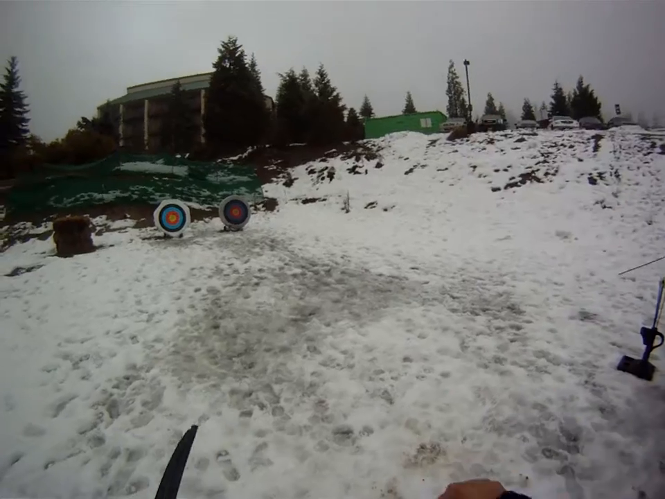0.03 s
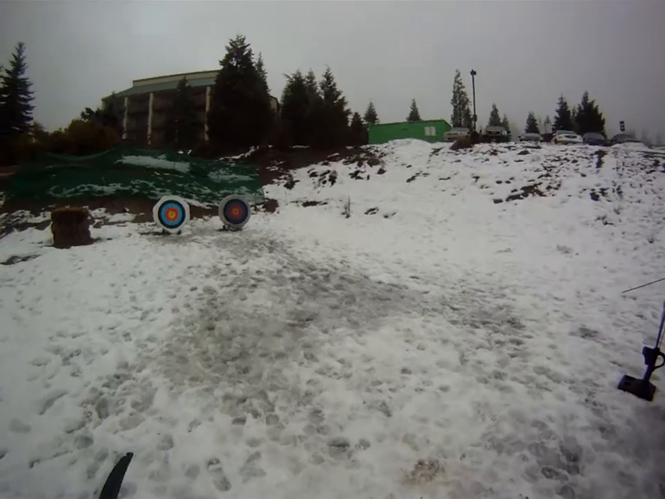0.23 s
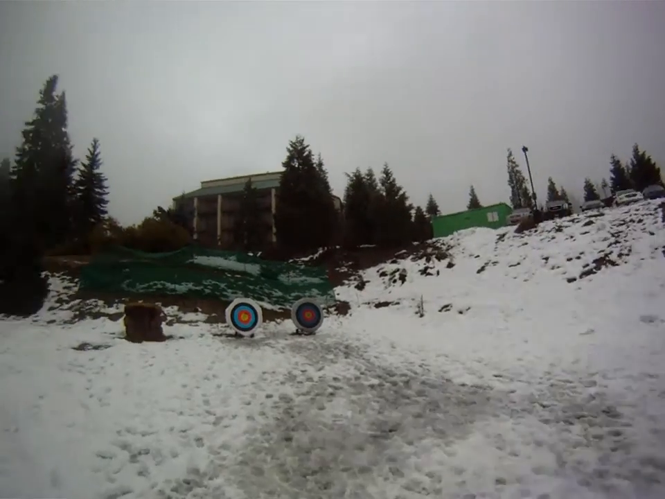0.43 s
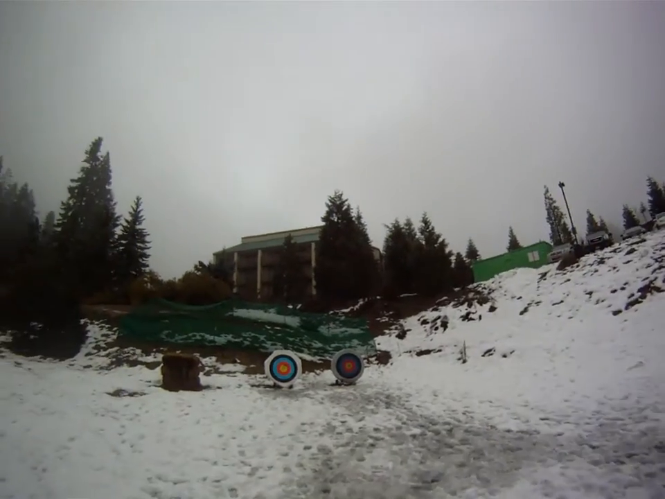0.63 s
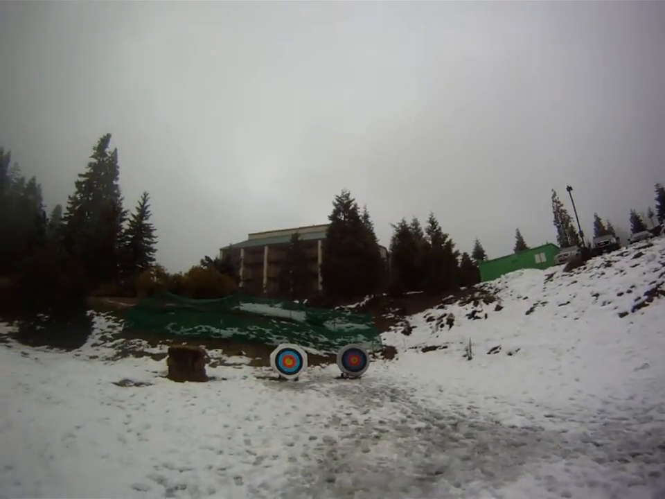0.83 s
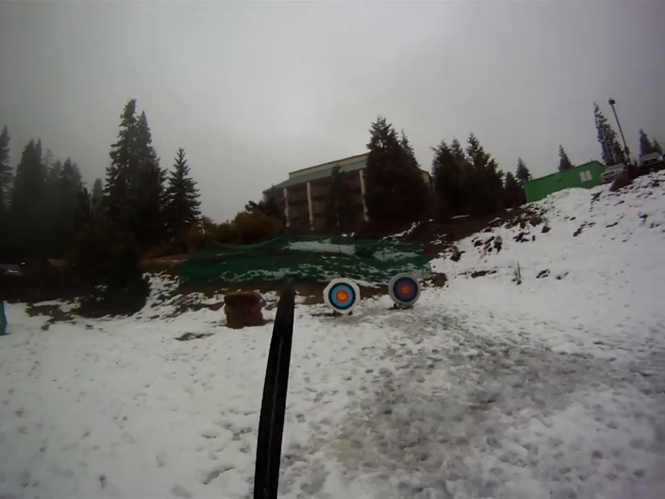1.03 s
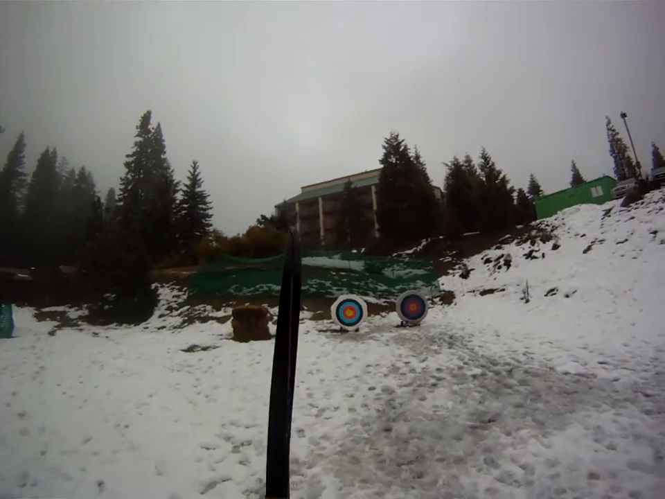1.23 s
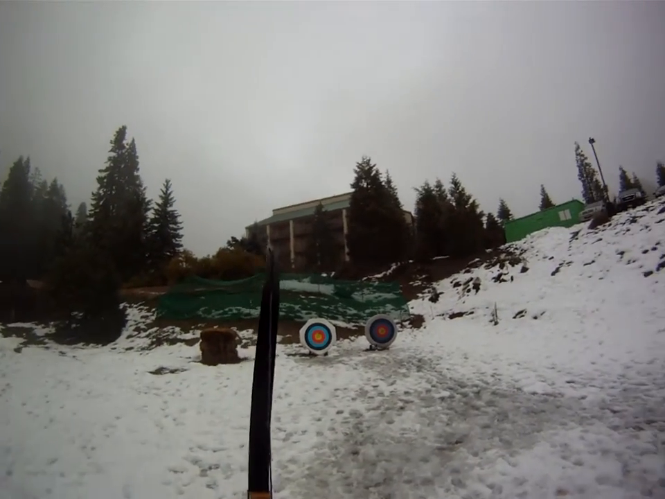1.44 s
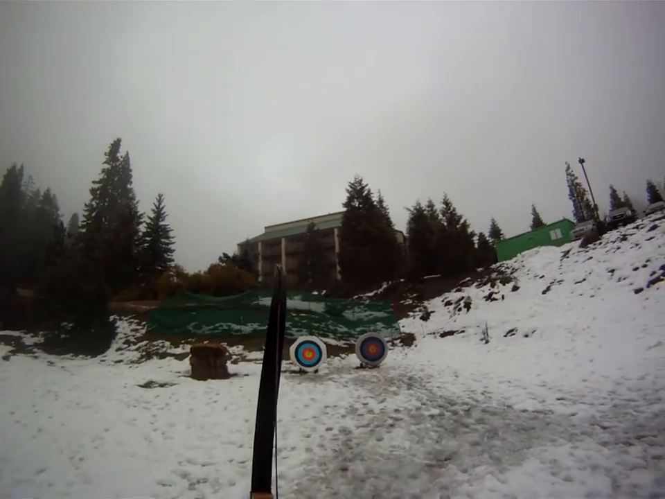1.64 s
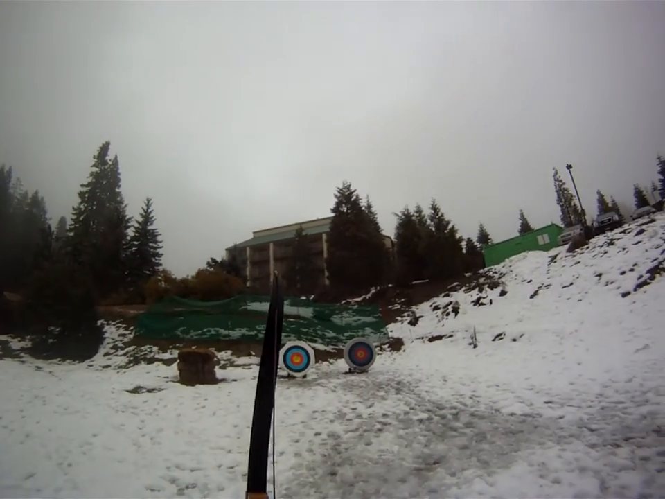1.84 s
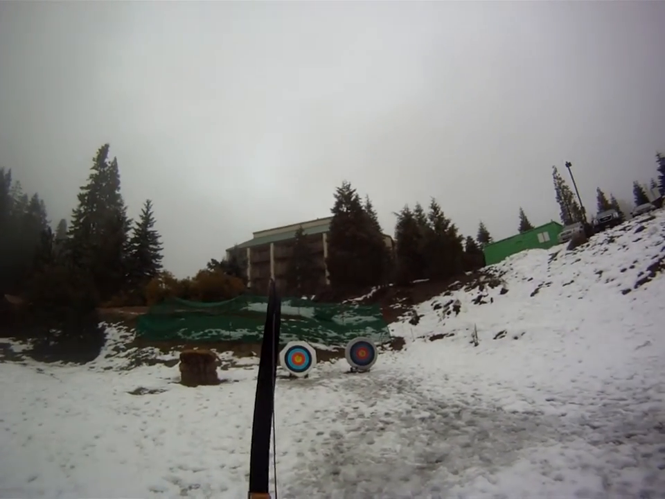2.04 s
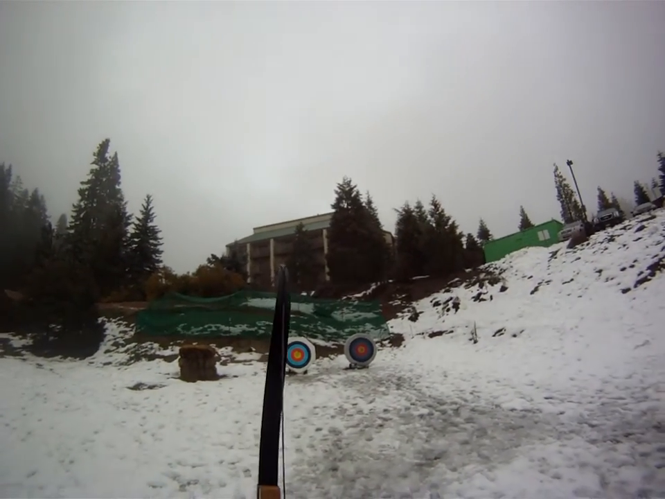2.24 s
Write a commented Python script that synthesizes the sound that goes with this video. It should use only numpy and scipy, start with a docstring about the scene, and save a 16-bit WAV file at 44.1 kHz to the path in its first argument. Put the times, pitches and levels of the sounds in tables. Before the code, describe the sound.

Light clicks and ticks of an arrow being fitted to a bow, over faint wind.

```python
"""An archer on a quiet snowy slope readies a bow, heard from a camera worn on the body.
First the arrow scuffs and slides along the bow by friction, then knocks home and rings in damped modes.
Light ticks follow, fittings clack, and after two seconds the nock clicks on the string. A faint slide
ends the scene. Throughout, light wind and body movement rumble in the microphone over a faint hiss."""
import sys
import numpy as np
from scipy import signal
from scipy.fft import rfft, irfft, next_fast_len
from scipy.io import wavfile
from scipy.ndimage import uniform_filter1d

SR = 44100
rng = np.random.default_rng(int(sys.argv[2]) if len(sys.argv) > 2 else 0)


def output_pcm(signal):
    """Save a mono or channel-first signal as 16-bit PCM at the path in sys.argv[1].

    Samples are clipped to [-1, 1] before scaling.
    """
    pcm = np.clip(np.atleast_2d(signal).T, -1, 1) * 32767
    wavfile.write(sys.argv[1], SR, np.round(pcm).astype(np.int16))


N = 105840
TIME = np.arange(N) / SR
BLOOM_S, SNAP_BLOOM_S = 0.00071, 0.00038  # time constants for vibration to spread through a part


# Each row: start in seconds, ring level in dB, crack level in dB.
KNOCKS = [(0.8548, -56, -49), (0.8568, -49, -47), (0.8594, -35.5, -40), (0.8633, -55, -56),
          (0.8695, -57, -56)]
# Each row: mode frequency in Hz, level in dB, 60 dB decay time in seconds.
ARROW_MODES = [(1568, -13, .08), (1778, -8, .066), (1883, -15, .04), (2005, -10, .06), (2175, -13, .095),
               (2285, -17, .05), (2395, -14.5, .075), (2995, -18.5, .07), (3542, -5, .036),
               (3860, -8.5, .03), (8150, -17, .035), (8455, -11, .035), (9825, -20, .06), (10120, -19, .05),
               (10430, -22, .066), (13790, -22, .06), (14190, -22, .06)]
# Each row: frequency in Hz, relative level in dB.
KNOCK_SPECTRUM = [(300, -16), (1200, -13), (1850, 11.5), (2800, -0.5), (3650, 6.5), (4300, -10), (5000, -9),
                  (7000, -9), (8400, -5.5), (10200, -11.5), (11300, -33), (13000, -28), (14000, -10),
                  (16000, -5)]
def arrow_knock():
    """Impact excitation: the arrow strikes the bow in quick succession and rings in its modes."""
    return impacts(KNOCKS, ARROW_MODES, KNOCK_SPECTRUM)


# Each row: start in seconds, ring level in dB, crack level in dB.
NOCK_CONTACTS = [(2.133, -59, -55), (2.1355, -49.5, -56), (2.138, -55, -52), (2.1686, -42, -44),
                 (2.172, -50, -48), (2.1778, -44, -52.5), (2.187, -59, -64)]
# Each row: mode frequency in Hz, level in dB, 60 dB decay time in seconds.
NOCK_MODES = [(1700, -15, .06), (2007, -8.5, .07), (2150, -6.5, .06), (2240, -10, .04), (2655, -6, .06),
              (2755, -6.5, .07), (2965, -13, .04), (3820, -17, .035), (9250, -15, .045), (9760, -20, .04),
              (14690, -18, .045)]
# Each row: frequency in Hz, relative level in dB.
NOCK_SPECTRUM = [(300, -21), (1300, -20), (2350, 14.5), (3400, -0.5), (6000, -10), (8200, -7.5),
                 (9600, 3.5), (11700, -33), (14600, -1.5)]
def nock_click():
    """Free vibration: nock and shaft ring on after each contact with the string."""
    return impacts(NOCK_CONTACTS, NOCK_MODES, NOCK_SPECTRUM)


# Each row: start in seconds, ring level in dB, snap level in dB, pitch ratio of the snap.
CLACKS = [(1.3885, -57, -37, 1), (1.3893, -50, -42.5, .99), (1.3927, -45.5, -51, 0.86),
          (1.3958, -52, -60, 1.1), (1.397, -46, -49, 0.99), (1.7536, -59, -44, 1.02),
          (1.7557, -65, -43, 1.05), (1.7585, -54.5, -66, 1), (2.0152, -65, -50, 1.05),
          (2.2256, -61, -52.5, 1.03)]
# Each row of both: mode frequency in Hz, level in dB, 60 dB decay time in seconds.
SNAP_MODES = [(1115, -20, 0.022), (3540, -5, 0.012), (3693, -3, 0.012), (5220, -1.5, 0.0099),
              (6610, -3.5, 0.011), (7920, -5.5, .009), (8450, -10, 0.0089)]
FITTING_MODES = [(1064, -14, 0.048), (1360, -16, .045), (1772, -11, .06), (2120, -12, 0.051),
                 (2350, -9, 0.041), (2610, -10.5, .04), (2920, -4.5, 0.035), (3310, -8, .028),
                 (3490, -7, 0.027), (3800, -9, 0.027), (4370, -12, 0.026), (8400, -8, 0.024),
                 (9100, -14, 0.027), (9660, -14, 0.024), (14500, -13.5, .024)]
# Each row: frequency in Hz, relative level in dB.
CLACK_SPECTRUM = [(300, -12), (1000, -5), (2200, 2), (3500, -3), (4500, -3), (9300, -7), (11800, -22),
                  (14500, -9)]
def fittings():
    """Modal damping: small hard parts snap briefly, each at its own pitch, over a longer ring."""
    starts, ring_db, snap_db, pitches = np.array(CLACKS).T
    snaps = sum(ring(impulses([(at, db)]), np.array(SNAP_MODES) * [pitch, 1, 1], SNAP_BLOOM_S)
                for at, db, pitch in zip(starts, snap_db, pitches))
    crack = cracks(zip(starts, snap_db - 15), CLACK_SPECTRUM)
    return snaps + crack + ring(impulses(zip(starts, ring_db)), FITTING_MODES, BLOOM_S)


# Each row: start in seconds, level in dB.
TICKS = [(0.109, -56.5), (0.5582, -51), (0.9289, -47), (0.9348, -42), (0.9403, -52), (0.9535, -52),
         (0.9793, -51.5), (0.9875, -55), (2.1686, -44), (2.172, -47), (2.1775, -51)]
# Each row: mode frequency in Hz, level in dB, 60 dB decay time in seconds.
TICK_MODES = [(3630, -9.5, 0.017), (5250, 1.5, 0.0083), (6660, 1.5, 0.007), (8200, -15, .014)]
def ticks():
    """Damped high modes: light, dry gear ticks and the bright edge of the nock clicking on the string."""
    return ring(impulses(TICKS), TICK_MODES, SNAP_BLOOM_S) + undb(-14) * cracks(TICKS, CLACK_SPECTRUM)


# Each row: peak time in seconds, level in dB, rise and fall widths in seconds.
SLIDES = [(0.763, -56.1, 0.08, 0.083), (2.39, -66, 0.08, .05)]
# Each row: frequency in Hz, relative level in dB.
SLIDE_SPECTRUM = [(300, -48), (1300, -4), (1800, -0.5), (2600, -3), (3300, -3), (4250, 3.5), (5200, -5.5),
                  (6500, -8), (7700, -2.5), (9000, -10), (10200, -12), (11500, -32), (13000, -21),
                  (14800, -13)]
# Each row: mode frequency in Hz, level in dB, 60 dB decay time in seconds.
SLIDE_MODES = [(1890, -6, 0.032), (2220, -6.5, 0.03), (2650, -1.5, 0.015), (3020, -6, 0.021),
               (4330, 1, .011), (7720, -5, .009)]
def arrow_slides():
    """Forced vibration: sliding along the bow drives the arrow's resonances."""
    return friction(SLIDES, SLIDE_SPECTRUM, SLIDE_MODES, ring_db=-5)


# Each row: peak time in seconds, level in dB, rise and fall widths in seconds.
SCUFFS = [(0.21, -61, 0.018, 0.026), (0.432, -56.5, 0.013, .014), (0.455, -61.5, 0.0091, 0.013),
          (0.562, -59.5, .003, 0.0066), (1.612, -64, 0.0024, 0.011)]
# Each row: frequency in Hz, relative level in dB.
SCUFF_SPECTRUM = [(400, -21.5), (1050, 2), (1450, -13), (2200, 7), (3200, -11), (3700, -4.5), (5500, -14),
                  (7200, -11.5), (8900, -18), (9700, -5), (10400, -19.5), (12500, -36), (14250, -9),
                  (15200, -24)]
def arrow_scuffs():
    """Friction noise in short strokes, which barely ring the nock and shaft."""
    return friction(SCUFFS, SCUFF_SPECTRUM, NOCK_MODES, ring_db=-23)


# Each row: centre in seconds, frequency in Hz, level in dB, Gaussian width in seconds.
MOUNT_JOLTS = [(0.278, 40.8, -33.5, 0.023), (0.366, 72.6, -40, 0.0097), (0.403, 49, -38, 0.017),
               (0.596, 41.7, -22, 0.013), (0.844, 46.6, -45, 0.014), (1.236, 45.8, -37, 0.024),
               (1.547, 37.8, -24, 0.0086), (2.067, 51, -46, 0.015), (2.212, 54.4, -44, 0.022)]
# Each row: peak time in seconds, level in dB, rise and fall widths in seconds.
RUSTLES = [(0.358, -52, 0.0049, 0.0084), (0.725, -57, 0.042, 0.043), (1.25, -69.5, 0.054, 0.099)]
# Each row: frequency in Hz, relative level in dB.
RUSTLE_SPECTRUM = [(40, -39), (110, -10.5), (190, 1.5), (280, -18), (600, -24), (3000, -49)]
def body_movement():
    """Structure-borne sound: low jolts and dull rustling travel through the body to the camera."""
    jolts = sum(undb(db) * np.sin(2 * np.pi * hz * (at - TIME)) * gaussian(at, width)
                for at, hz, db, width in MOUNT_JOLTS)
    return jolts + swells(RUSTLES) * colour(noise(), RUSTLE_SPECTRUM)


# Each row: time in seconds, level in dB.
WIND_LEVELS = [(0, -47.5), (0.33, -47.5), (0.45, -46), (0.7, -45), (0.95, -47), (1.1, -53), (1.35, -56),
               (1.5, -48.5), (1.72, -51), (1.9, -57), (2.4, -54.5)]
# Each row: frequency in Hz, relative level in dB.
WIND_SPECTRUM = [(10, -26), (22, -1), (35, -2), (50, 5), (62, -7.5), (80, -8.5), (105, -21), (180, -43),
                 (1500, -96)]
def wind():
    """Pressure fluctuation: wind buffets the microphone with a deep rumble that eases unevenly."""
    level_db = np.interp(TIME, *np.array(WIND_LEVELS).T)
    return unit(colour(noise(), WIND_SPECTRUM)) * undb(level_db)


# Each row of both: frequency in Hz, relative level in dB.
HISS_MID_SPECTRUM = [(60, 4.5), (150, 6.5), (300, 2), (600, -2), (1400, -7), (1950, -7), (2300, -5.5),
                     (3200, -12), (5000, -14.5), (7100, -17.5), (8700, -19.5), (9700, -18), (11200, -26.5),
                     (13000, -28.5), (14300, -18.5), (16000, -31.5)]
HISS_SIDE_SPECTRUM = [(40, -37), (400, -3.5), (4200, -5), (8500, -9.5), (10500, -36)]
def hiss():
    """Noise floor of air and microphone; a weak antiphase part makes left and right differ slightly."""
    mid = colour(noise(), HISS_MID_SPECTRUM)
    side = undb(-16.5) * colour(noise(), HISS_SIDE_SPECTRUM)
    level_db = -62 + 0.67 * wander(rate_hz=2.6)
    return undb(level_db) * np.array([mid + side, mid - side])


def impacts(rows, modes, spectrum):
    """Superposition: each contact gives a modal ring and a noisy crack."""
    starts, ring_db, crack_db = np.array(rows).T
    return ring(impulses(zip(starts, ring_db)), modes, BLOOM_S) + cracks(zip(starts, crack_db), spectrum)


def impulses(rows):
    """Ideal impacts: one impulse for each contact."""
    force = np.zeros(N)
    for at, db in rows:
        force[int(at * SR)] += undb(db)
    return force


def ring(force, modes, bloom_s):
    """Convolution of a force with the impulse response of damped modes."""
    t = np.arange(SR // 4) / SR
    response = sum(undb(db) * np.sin(2 * np.pi * hz * t) * decay(t, t60) for hz, db, t60 in modes)
    onset = 1 - np.exp(-t / bloom_s)
    return signal.fftconvolve(force, response * onset)[:N]


def cracks(rows, spectrum):
    """Broadband transients: a noise burst with a faint tail at each contact."""
    envelope = sum(undb(db) * (decay(TIME - at, t60=0.0079) + undb(-10) * decay(TIME - at, t60=0.043))
                   for at, db in rows)
    return colour(noise() * envelope, spectrum)


def friction(strokes, spectrum, modes, ring_db):
    """Random excitation: grainy rubbing noise plus the resonance of the shaft."""
    grain = unit(noise() * undb(2 * wander(rate_hz=590)))
    shaft = unit(ring(noise(), modes, BLOOM_S))
    return swells(strokes) * (colour(grain, spectrum) + undb(ring_db) * shaft)


def swells(rows):
    """Amplitude envelope of strokes that rise and fall smoothly."""
    return sum(undb(db) * gaussian(at, np.where(TIME < at, rise, fall)) for at, db, rise, fall in rows)


def gaussian(at, width):
    """Bell-shaped envelope."""
    return np.exp(-.5 * ((TIME - at) / width) ** 2)


def decay(t, t60):
    """Exponential decay from t = 0, falling 60 dB in t60 seconds."""
    return (t >= 0) * np.exp(-np.log(1000) * np.maximum(t, 0) / t60)


def colour(x, spectrum):
    """Minimum-phase filtering; white noise keeps its power."""
    hz, db = np.array(spectrum, float).T
    size = next_fast_len(N + 8192) // 2 * 2
    bin_hz = np.arange(size // 2 + 1) * SR / size
    gain = unit(undb(np.interp(np.log(bin_hz + 1), np.log(hz), db)))
    cepstrum = irfft(np.log(gain))
    cepstrum[1:size // 2] *= 2  # folding the cepstrum makes the filter causal
    cepstrum[size // 2 + 1:] = 0
    return irfft(rfft(x, size) * np.exp(rfft(cepstrum)))[:N]


def wander(rate_hz):
    """Smooth random fluctuation with an rms of one."""
    window = max(int(SR / rate_hz), 1)
    return unit(uniform_filter1d(uniform_filter1d(noise(), window), window))


def noise():
    """White noise."""
    return rng.standard_normal(N)


def unit(x):
    """Scale to an rms of one."""
    return x / np.sqrt(np.mean(x ** 2))


def undb(db):
    """Decibels to gain."""
    return 10 ** (np.asarray(db) / 20)


def scene():
    """Linear superposition: the gear sounds dry and central over the background."""
    clicks = arrow_knock() + nock_click() + fittings() + ticks()
    rubs = arrow_slides() + arrow_scuffs()
    return clicks + rubs + body_movement() + wind() + hiss()


def record(dry):
    """Filtering and modulation: the camera dips a treble band, adds faint sidebands and cuts the top."""
    dip_hz, dip_width_hz, dip_depth = 6020, 1400, .82
    carrier_hz, cutoff_hz = 12000, 15150
    band = signal.lfilter(*signal.iirpeak(dip_hz, dip_hz / dip_width_hz, fs=SR), dry)
    dipped = dry - dip_depth * band
    # The sidebands mirror the strong bass around the carrier frequency.
    modulated = dipped * (1 + undb(-42.5) * np.cos(2 * np.pi * carrier_hz * TIME))
    return signal.sosfilt(signal.ellip(8, .2, 60, cutoff_hz, fs=SR, output="sos"), modulated)


dry = scene()
out = record(dry)
output_pcm(out)
```